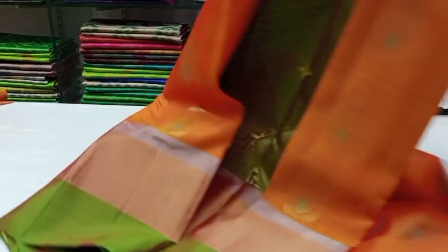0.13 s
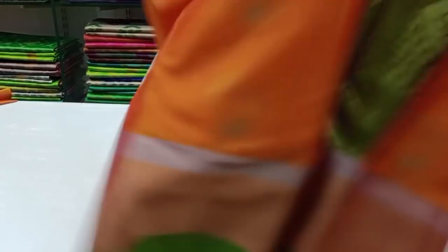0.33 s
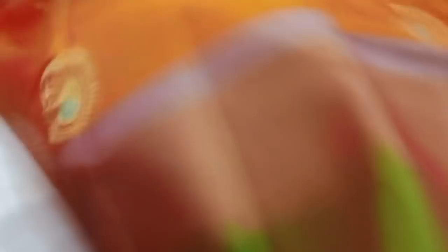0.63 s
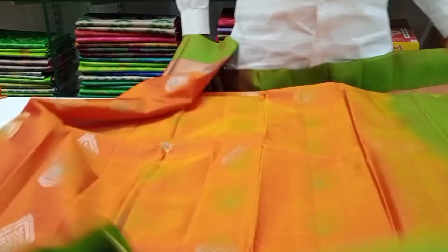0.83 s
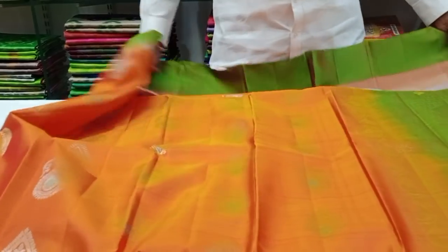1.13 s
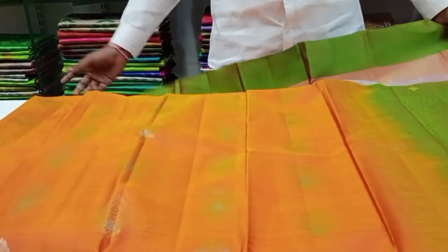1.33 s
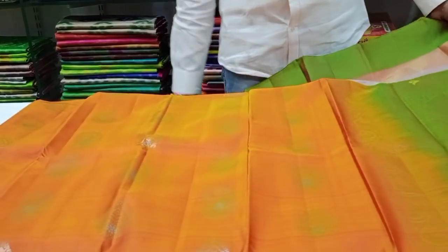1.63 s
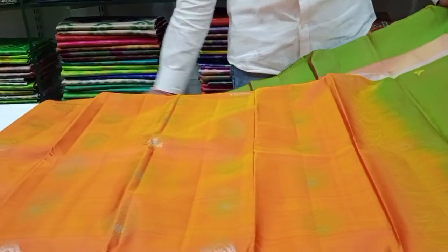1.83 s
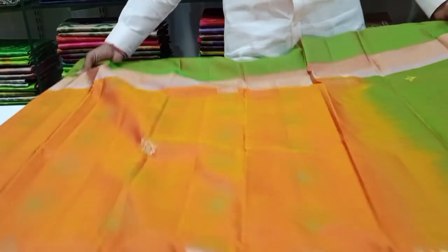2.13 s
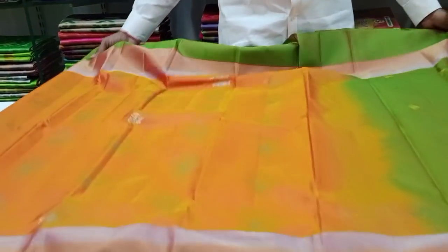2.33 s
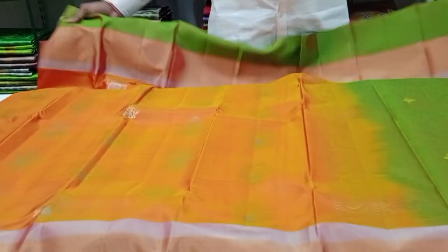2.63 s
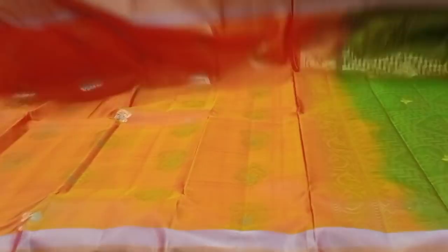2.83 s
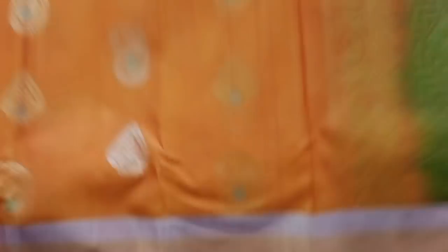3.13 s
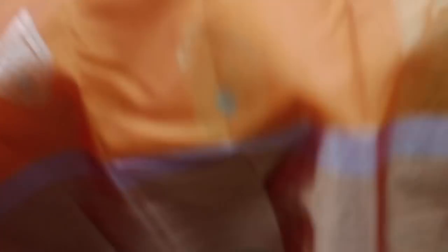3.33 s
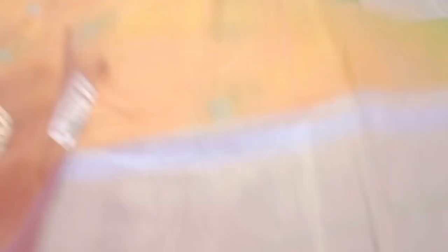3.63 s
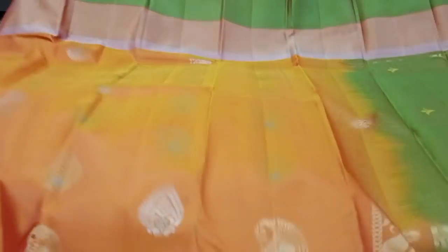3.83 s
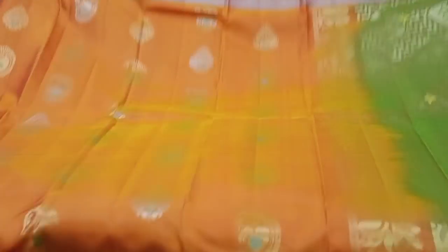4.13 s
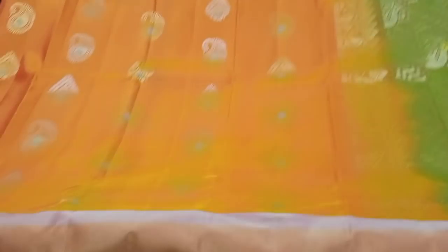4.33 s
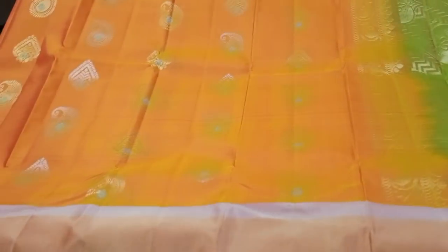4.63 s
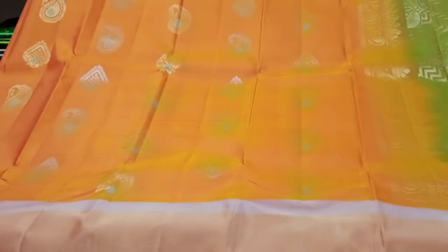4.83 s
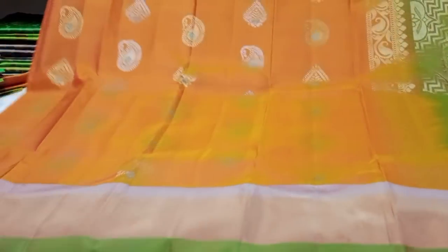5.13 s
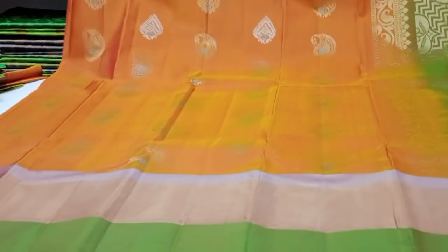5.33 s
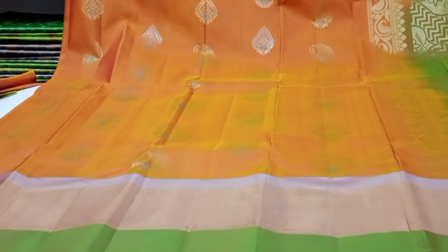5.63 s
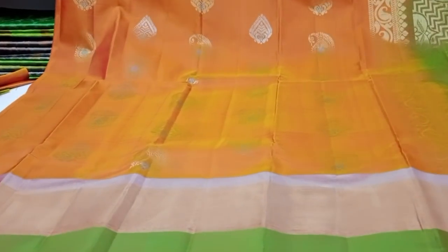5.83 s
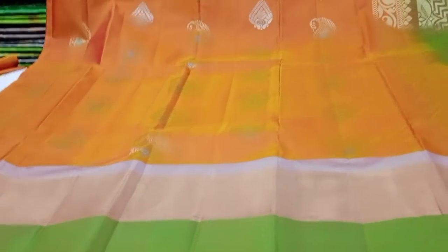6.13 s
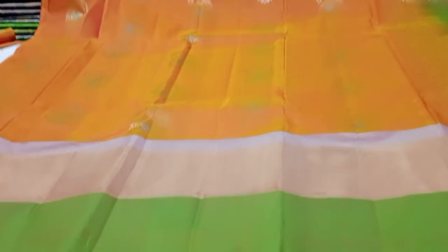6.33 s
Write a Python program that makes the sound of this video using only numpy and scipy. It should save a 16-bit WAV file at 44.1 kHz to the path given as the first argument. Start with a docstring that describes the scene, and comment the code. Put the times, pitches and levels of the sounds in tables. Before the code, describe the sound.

In a quiet shop, close to a hand-held microphone, silk is lifted with crisp swishes and crease snaps, building to a loud flapping slap and low air thump. Softer slides and a quick zipping pull follow, then two dull, heavy puffs of air. After a near-quiet pause come a small creaky grip noise and short, squeaky brushing strokes on the microphone case.

```python
"""A silk sari is lifted, shaken out and spread on a shop counter, close to a hand-held microphone.
Sliding cloth is a stream of random thread clicks and hiss; creases snap and folds slap as clicks with scuffs.
The air it pushes buffets the microphone: swelling low noise, with short booms from damped modes.
Later something brushes in short strokes close by, probably a finger or sleeve on the microphone's case:
stick and slip, with ringing modes and gliding bands. Steady coloured noise is the quiet shop behind."""
import sys
import numpy as np
from scipy import signal
from scipy.fft import rfft, irfft, next_fast_len
from scipy.io import wavfile
from scipy.ndimage import uniform_filter1d

SR = 44100
rng = np.random.default_rng(int(sys.argv[2]) if len(sys.argv) > 2 else 0)


def output_pcm(signal):
    """Save a mono or channel-first signal as 16-bit PCM at the path in sys.argv[1].

    Samples are clipped to [-1, 1] before scaling.
    """
    pcm = np.clip(np.atleast_2d(signal).T, -1, 1) * 32767
    wavfile.write(sys.argv[1], SR, np.round(pcm).astype(np.int16))


N = 286341

# Creases snapping. Each row: time in seconds, relative level in dB.
SNAPS = [(0.234, -19.5), (0.378, -21.5), (0.491, -21), (1.1821, -18), (1.55, -36.5), (1.743, -31),
         (2.188, -44), (2.8357, -39.5), (3.2233, -35.5), (3.789, -38), (3.9845, -42.5), (4.0614, -38)]
# The grip on the case shifts. Each row: peak in seconds, rise in seconds, fall in seconds, level in dB.
GRIPS = [(4.67, 0.025, 0.069, -47), (4.722, 0.092, 0.047, -49), (5.097, 0.027, 0.029, -58.5)]
# One long rub that presses ever harder. Each row: time in seconds, scrape level in dB, body level in dB.
RUBBING = [(5.96, -93, -66), (6.0, -54.5, -66), (6.04, -39, -56), (6.115, -43.5, -44), (6.143, -60, -49),
           (6.165, -94, -79)]
# Colour of the gripped case. Each row: frequency in Hz, relative level in dB per Hz.
GRIP_COLOUR = [(200, -17), (760, -1), (950, -23), (1230, 7.5), (1700, 2), (1880, -14), (2330, 9.5),
               (2600, -2.5), (3200, -35), (3750, -8), (5500, -15), (15000, -74)]

SWELL_DEPTH_DB = 20   # the rise and fall times of a swell are counted from this far below its top
STROKE_ROUNDNESS = 1.93   # shape of a swell: 1 = pointed, 2 = bell-shaped


def from_db(db):
    """Decibels to gain."""
    return 10 ** (np.asarray(db) / 20)


def rms_one(x):
    """Scale to unit rms."""
    return x / np.sqrt(np.mean(x ** 2) + 1e-20)


def evened(x):
    """Hold the short-term level (over 50 ms) at unit rms."""
    power = np.abs(uniform_filter1d(x ** 2, size=2200))
    return x / np.sqrt(power + 1e-18)


def cut(x, hz, kind, order=2):
    """Butterworth filter."""
    sections = signal.butter(order, hz, kind, fs=SR, output="sos")
    return signal.sosfilt(sections, x + 1e-18)


def unit_in(x, band):
    """Scale so that the given band has unit rms."""
    return x / np.std(cut(x, band, "band", order=4))


def colour(x, spectrum):
    """Causal (minimum-phase) filter with the given spectrum, found by folding its cepstrum."""
    size = 2 * next_fast_len(N // 2 + 8192)
    hz, db = np.transpose(spectrum)
    grid = np.maximum(np.arange(size // 2 + 1) * SR / size, 1)
    magnitude = from_db(np.interp(np.log(grid), np.log(hz), db))
    cepstrum = irfft(np.log(magnitude))
    cepstrum[1:size // 2] *= 2
    cepstrum[size // 2 + 1:] = 0
    response = np.exp(rfft(cepstrum))
    return irfft(rfft(x, size) * response)[:N]


def gains(rows):
    """Each dB column of a curve as a gain per sample; a curve that starts late is silent until then."""
    s, *columns = np.transpose(rows)
    t = np.arange(N) / SR
    silent = -140
    starts_late = s[0] > 1
    return [from_db(np.interp(t, s, c, left=silent if starts_late else c[0], right=silent))
            for c in columns]


def swells(rows, roundness, length=1):
    """Each row swells to its peak and dies away; one gain per sample for each dB column."""
    rows = np.asarray(rows)
    t = np.arange(0, N + 32, 32) / SR
    s, rise, fall = rows.T[:3, :, None]
    away = np.maximum((s - t) / rise, (t - s) / fall) / length
    shapes = from_db(-SWELL_DEPTH_DB * np.minimum(np.abs(away) ** roundness, 10))
    # overlapping swells add in power
    levels = [np.sqrt(from_db(db) ** 2 @ shapes ** 2) for db in rows.T[3:]]
    return [np.interp(np.arange(N) / SR, t, level) for level in levels]


def drift(rate):
    """Slow random wander with unit rms: noise through two equal poles at this rate in Hz."""
    step = 40   # drawn once in this many samples
    r = np.exp(-2 * np.pi * rate * step / SR)
    noise = rng.standard_normal(N // step + 2002)
    slow = signal.lfilter([1], [1, -2 * r, r * r], noise)[2000:]   # settled part
    return np.interp(np.arange(N) / step, np.arange(len(slow)), rms_one(slow))


def friction(per_s, spread_db, smooth_db):
    """Threads catch and let go: random clicks of uneven size over a smooth hiss."""
    sizes = from_db(spread_db * np.minimum(rng.exponential(1, N), 3)) * rng.choice([-1, 1], N)
    catches = rng.random(N) < per_s / SR
    clicks = rms_one(sizes * catches)
    return rms_one(clicks + from_db(smooth_db) * rng.standard_normal(N))


def touches(times, levels_db, scuff_s, scuff_db):
    """One click per touch, trailed by a short dying scuff."""
    out, age = np.zeros(N + SR), np.arange(SR // 10) / SR
    for s, db in zip(times, levels_db):
        burst = from_db(scuff_db) * rng.standard_normal(len(age)) * np.exp(-age / scuff_s)
        burst[0] = 1
        at = round(s * SR)
        out[at:at + len(age)] += from_db(db) * burst
    return out[:N]


def ring(x, modes):
    """Parallel damped modes; a unit click rings each at its own level."""
    out = np.zeros(N)
    for k, (hz, width, db) in enumerate(modes):
        r, w = np.exp(-np.pi * width / SR), 2 * np.pi * hz / SR
        mode = signal.lfilter([0, np.sin(w)], [1, -2 * r * np.cos(w), r * r], x + 1e-18)
        out += (-1) ** k * from_db(db) * mode
    return out


def shifting_echoes(x, rate, depth, count=10):
    """Reflections off nearby moving surfaces comb the sound into wandering patches."""
    out, power = x.copy(), 1
    delays_s = np.geomspace(.0005, .005, count) * rng.uniform(.85, 1.15, count)
    for lag in (delays_s * SR).astype(int):
        share = depth * drift(rate)
        out[lag:] += (share * x)[:N - lag]
        power = power + share ** 2
    return out / np.sqrt(power)


def gliding(rows, width_hz):
    """Each row swells and fades as an evened narrow band of noise whose pitch glides steadily."""
    out, t = np.zeros(N), np.arange(N) / SR
    a, b = cut(rng.standard_normal((2, N)), width_hz / 2, "low")
    size = np.sqrt(np.abs(uniform_filter1d(a ** 2 + b ** 2, size=700)) / 2) + 1e-12
    for s, rise, fall, db, hz, glide in rows:
        near = (t > s - 2 * rise) & (t < s + 2 * fall)
        age = t[near] - s
        phase = 2 * np.pi * (hz * age + glide * age ** 2 / 2)
        level = from_db(db - SWELL_DEPTH_DB * np.maximum(-age / rise, age / fall) ** 2)
        out[near] += level * (a[near] * np.cos(phase) + b[near] * np.sin(phase)) / size[near]
    return out


def room_tone():
    """The quiet shop: steady noise, strongest in the bass."""
    # Each row: frequency in Hz, relative level in dB per Hz.
    shop = [(24, -34.5), (143, -3.5), (242, -11), (2290, -27.5), (5500, -39), (8210, -51)]
    return from_db(-63.5) * rms_one(colour(rng.standard_normal(N), shop))


def rumble():
    """A firm grip or rub shakes the whole case in the bass."""
    (grip,), (_, body) = swells(GRIPS, STROKE_ROUNDNESS), gains(RUBBING)
    grip_shake = grip.max() * (grip / grip.max()) ** 1.3   # grows faster than the grip
    pressure = from_db(6) * grip_shake + from_db(-1.5) * body
    return pressure * evened(cut(rng.standard_normal(N), [62, 165], "band"))


def creaks():
    """The grip lets go in a run of jerks: each knocks the case, and the first ones rasp in its upper modes."""
    # Each row: time in seconds, relative knock level in dB, relative rasp level in dB.
    jerks = [(4.6563, -30.5, -29.5), (4.664, -49, -34), (4.672, -49, -33.5), (4.704, -27.5, -48),
             (4.7165, -32, -59), (4.754, -38, -68)]
    # Upper modes of the case. Each row: frequency in Hz, width in Hz, relative level in dB.
    upper_modes = [(3690, 190, 0), (4300, 330, -2), (5430, 210, -6), (11000, 8200, -15)]
    s, knock_db, rasp_db = np.transpose(jerks)
    knock = colour(touches(s, knock_db, scuff_s=0.0022, scuff_db=-16.0), GRIP_COLOUR)
    rasp = ring(touches(s, rasp_db, scuff_s=0.004, scuff_db=-20.5), upper_modes)
    rasp = cut(rasp, 3100, "high", order=6)
    return from_db(15.5) * knock + from_db(-7.5) * rasp


def slips():
    """Each larger catch of the brushing slips and rings the case briefly."""
    # Each row: time in seconds, relative level in dB.
    catches = [(5.286, -41), (5.678, -26), (5.741, -34), (5.873, -41), (5.887, -33.5), (5.8953, -26),
               (6.227, -44), (6.335, -40.5)]
    # Modes under a light touch. Each row: frequency in Hz, width in Hz, relative level in dB.
    case_modes = [(1330, 58, -7.5), (2340, 82, 1), (2845, 150, 4.5), (4270, 220, -39)]
    s, db = np.transpose(catches)
    ringing = ring(touches(s, db, scuff_s=0.0016, scuff_db=-28.5), case_modes)
    return from_db(-9.5) * cut(ringing, [1100, 6500], "band")


def pressing():
    """Firm contact scrapes broadly, and more pressure brings out the low body of the case."""
    # Colour of the rub. Each row: frequency in Hz, relative level in dB per Hz.
    rub = [(130, -27), (450, 6.5), (820, 0), (960, -5), (1280, 6.5), (1700, -4), (2450, 3.5), (3450, -11),
           (4050, -5.5), (5400, -7), (7600, -26), (15000, -54.5)]
    (grip,), (scrape, body) = swells(GRIPS, STROKE_ROUNDNESS), gains(RUBBING)
    creak = colour(friction(per_s=450, spread_db=2.5, smooth_db=-1.5), GRIP_COLOUR)
    creak = unit_in(creak, [1100, 3200])
    drag = friction(per_s=820, spread_db=-1.5, smooth_db=-11.0)
    drag = colour(shifting_echoes(drag, rate=20.5, depth=0.2), rub)
    drag = drag * from_db(2.0 * drift(140))   # the rub judders
    upper = unit_in(cut(drag, 1140, "high", order=4), [1100, 3200])
    lower = unit_in(cut(drag, 810, "low", order=4), [400, 1000])
    return grip * creak + scrape * upper + body * lower


def brushing():
    """Light stick and slip sings in narrow bands of the case; harder strokes reach its upper resonances."""
    # Light strokes. Each row: peak in seconds, rise in seconds, fall in seconds, level in dB.
    strokes = [(4.925, 0.052, 0.053, -58), (5.03, 0.04, 0.033, -57), (5.365, 0.086, 0.11, -43.5),
               (5.57, 0.069, 0.059, -57.5), (5.695, 0.081, 0.088, -44), (5.9, 0.023, 0.028, -48),
               (5.99, 0.035, 0.091, -47), (6.11, 0.041, 0.039, -41), (6.222, 0.02, 0.021, -51.5),
               (6.34, 0.041, 0.042, -64.5)]
    # Sliding resonances. Each row: peak, rise and fall in seconds, level in dB, pitch in Hz, glide in Hz per s.
    sings = [(4.874, 0.017, 0.018, -51, 2470, -1500), (4.885, 0.036, 0.047, -55.5, 1408, -2000),
             (5.3, 0.028, 0.064, -48, 2960, -4000), (5.365, 0.063, 0.082, -44.5, 2583, -8000),
             (5.365, 0.051, 0.07, -54.5, 3680, -5000), (5.37, 0.087, 0.043, -60.5, 5430, 5000),
             (5.49, 0.13, 0.15, -71.5, 3100, 2), (5.705, 0.057, 0.06, -57, 3340, -3000)]
    # Colour of the stroke. Each row: frequency in Hz, relative level in dB per Hz.
    brush = [(1100, -28), (1400, -6), (1700, -20), (2000, -1.5), (2400, 1.5), (2950, 2.5), (3300, -9),
             (3650, -28.5), (9000, -62)]
    # Colour of the upper resonances. Each row: frequency in Hz, relative level in dB per Hz.
    upper = [(2800, 4), (3600, 4.5), (4200, 7.5), (4600, -19), (5050, 12), (5720, -0.5), (6100, -6),
             (8000, -32)]
    (light,) = swells(strokes, STROKE_ROUNDNESS)
    catches = friction(per_s=450, spread_db=4.0, smooth_db=-5.0) * from_db(1.5 * drift(96))
    catches = shifting_echoes(catches, rate=5, depth=.45)
    stroke = unit_in(colour(catches, brush), [1900, 3400])
    squeak = from_db(-12.5) * (light / light.max()) ** 0.62 * rms_one(colour(catches, upper))
    return light * (stroke + squeak) + gliding(sings, width_hz=200)


def booms(rows, mode):
    """A padded push swells into a low, short boom: a scuffed click through the same mode twice."""
    s, db = np.transpose(rows)
    push = touches(s, db, scuff_s=0.0087, scuff_db=-62.0)
    push = ring(ring(push, mode), mode)
    push = cut(push, 50, "high", order=4)
    return push * from_db(db.max()) / np.abs(push).max()


def bumps():
    """Soft bumps of hands and cloth, each a padded low boom."""
    # Each row: time in seconds, relative level in dB.
    bump_times = [(1.313, -41.5), (1.466, -37), (1.544, -36.5), (4.915, -43), (5.107, -45), (5.685, -46)]
    return booms(bump_times, [(143.2, 26.5, 0)])   # mode: Hz, width in Hz, dB


def thumps():
    """Fronts of pushed air hit the microphone and boom low."""
    # Each row: time in seconds, relative level in dB.
    fronts = [(0.670, -22), (3.362, -25.5), (3.522, -28.5), (3.905, -38), (4.565, -41)]
    return booms(fronts, [(70.5, 62, 0)])   # mode: Hz, width in Hz, dB


def sliding():
    """Rustle, hiss and sheen gains: the long slide with quick pulls of silk over silk on top."""
    # The sheet is hauled up, dragged over the counter, then slowly settles.
    # Each row: time in seconds, rustle level in dB, hiss level in dB, sheen level in dB.
    slide = [(0.0, -47, -65.5, -71.5), (0.16, -58, -57.5, -63), (0.41, -49, -62.5, -62.5),
             (0.57, -45, -54, -61), (0.655, -44, -51.5, -56), (0.69, -36, -41.5, -52),
             (0.85, -44, -51.5, -67), (0.9, -41.5, -52, -64), (1.05, -60, -65, -93),
             (1.33, -61.5, -63, -78), (1.55, -68, -84, -97), (2.4, -75.5, -78, -84),
             (2.57, -62.5, -76.5, -83), (2.8, -73.5, -83.5, -93), (4.6, -77.5, -83, -101)]
    # Quick pulls. Each row: peak, rise and fall in seconds, then rustle, hiss and sheen levels in dB.
    swishes = [(0.258, 0.073, 0.016, -46.5, -59, -58), (0.49, 0.045, 0.057, -44.5, -47.5, -55),
               (0.61, 0.015, 0.034, -61, -38.5, -56), (1.188, 0.083, 0.073, -49.5, -49.5, -49.5),
               (1.85, 0.21, 0.15, -60, -58, -76), (2.18, 0.17, 0.077, -63.5, -67, -80),
               (2.665, 0.072, 0.096, -47.5, -50.5, -101), (2.706, 0.062, 0.035, -43.5, -38.5, -57),
               (2.95, 0.14, 0.078, -61.5, -73, -75)]
    return np.hypot(gains(slide), swells(swishes, roundness=1.53))


def fullness():
    """0-1: when the whole sheet moves, its many folds merge into one even rush."""
    rustle, _, _ = sliding()
    full_rush_db = -41.5   # rustle level at which single folds are no longer told apart
    return np.clip(rustle / from_db(full_rush_db), 0, 1)


def billowing():
    """Draught and flap gains: every billow drives both, over a faint stir while the sheet still moves."""
    # Each row: peak, rise and fall of the draught in seconds, draught level in dB, flap level in dB.
    billows = [(0.255, 0.17, 0.058, -42.5, -49), (0.42, 0.091, 0.12, -35, -40.5),
               (0.53, 0.12, 0.072, -36.5, -42.5), (0.625, 0.085, 0.087, -29.5, -34.5),
               (0.682, 0.023, 0.042, -23, -23.5), (0.73, 0.077, 0.075, -27.5, -28.5),
               (0.803, 0.045, 0.11, -31.5, -28.5), (0.892, 0.081, 0.16, -32.5, -31.5),
               (1.28, 0.22, 0.33, -49, -63), (1.8, 0.22, 0.18, -50.5, -57.5), (2.0, 0.14, 0.049, -45, -80),
               (2.18, 0.17, 0.049, -50.5, -59.5), (2.75, 0.25, 0.18, -51.5, -59.5),
               (2.93, 0.097, 0.1, -44, -56.5), (3.17, 0.25, 0.54, -48, -68),
               (3.388, 0.042, 0.059, -25, -52.5), (3.475, 0.13, 0.085, -24.5, -36),
               (3.58, 0.092, 0.17, -40, -58.5), (3.92, 0.15, 0.12, -47, -85)]
    roundness, stir_db, stir_end_s = 1.18, -64.5, 4.6
    draught, _ = swells(billows, roundness)
    _, flap = swells(billows, roundness, length=0.79)   # flapping is shorter than its puff of air
    moving = np.clip((stir_end_s - np.arange(N) / SR) * 10, 0, 1)
    return np.hypot(draught, from_db(stir_db) * moving), flap


def air():
    """Lumpy eddies at the microphone port, and the faster flutter of the sheet."""
    # Colour of the eddies. Each row: frequency in Hz, relative level in dB per Hz.
    wind = [(15, -64.5), (30, -11.5), (62, 2.5), (145, 8), (200, -9.5), (290, -25), (700, -87)]
    # Colour of the fluttering sheet. Each row: frequency in Hz, relative level in dB per Hz.
    sheet = [(110, -18), (210, -5), (355, 2.5), (480, -4.5), (660, -12), (950, -17), (2500, -60)]
    draught, flap = billowing()
    # the gust sets the strength; single eddies vary only a little
    eddies = evened(colour(rng.standard_normal(N), wind))
    flutter = friction(per_s=900, spread_db=2.0, smooth_db=1.5)
    flutter = shifting_echoes(flutter, rate=5.85, depth=0.57)
    flutter = evened(colour(flutter, sheet)) * from_db(1.9 * drift(41))
    flutter = unit_in(flutter, [260, 900])
    # air alone gives a dull billow; rubbing cloth opens it up into flutter
    billow = evened(cut(rng.standard_normal(N), [190, 335], "band", order=4))
    rustle, _, _ = sliding()
    contact = np.clip(from_db(9.0) * rustle / (flap + 1e-9), 0, 1)
    return draught * eddies + flap * (contact * flutter + from_db(4.5) * (1 - contact) * billow)


def thin_squeaks():
    """Faint, short, nearly pure tones of steady pitch."""
    # Each row: peak in seconds, level in dB, pitch in Hz.
    tones = [(1.235, -55, 799), (3.055, -63.5, 1423), (3.335, -62, 1450), (4.356, -57.5, 598)]
    swell_s = 0.056   # both rise and fall
    return gliding([(s, swell_s, swell_s, db, hz, 0) for s, db, hz in tones], width_hz=65)


def zips():
    """Taut silk zips over its own ribs, in narrow bands of gliding pitch."""
    # Each row: peak, rise and fall in seconds, level in dB, pitch in Hz, glide in Hz per second.
    pulls = [(1.07, 0.36, 0.12, -59.5, 2940, -1000), (1.255, 0.027, 0.046, -53, 2770, -3000),
             (1.84, 0.13, 0.15, -56, 1628, -2500), (1.87, 0.052, 0.044, -55.5, 6060, -3000),
             (2.645, 0.061, 0.05, -50, 3510, 9997), (2.66, 0.051, 0.023, -46, 2560, 2997)]
    return gliding(pulls, width_hz=450)


def slaps():
    """A broad fold lands abruptly on the counter and crumples in a dying midrange rush."""
    # Each row: time in seconds, relative level in dB.
    landings = [(0.673, -30.5), (0.716, -31), (0.729, -34.5), (0.787, -39), (0.814, -47), (0.882, -33),
                (0.961, -42)]
    # Colour of the slap. Each row: frequency in Hz, relative level in dB per Hz.
    slap = [(300, -3), (750, -3), (1800, -11.5), (6000, -54)]
    s, db = np.transpose(landings)
    crumple_db = -12   # below the click; the row level is that of the crumpling
    blows = touches(s, db - crumple_db, scuff_s=0.036, scuff_db=crumple_db)
    return colour(blows, slap) / np.std(colour(rng.standard_normal(N), slap))


def creases():
    """A fold pulled taut snaps straight; softer snaps are duller."""
    # Colour of a snap. Each row: frequency in Hz, relative level in dB per Hz.
    crease = [(400, -41), (1200, -7), (2800, 4), (8000, -22.5), (15000, -35)]
    s, db = np.transpose(SNAPS)
    snaps = colour(touches(s, db, scuff_s=.003, scuff_db=-22), crease)
    force = np.interp(np.arange(N) / SR, s, from_db(db - db.max()))
    snaps = force * snaps + (1 - force) * cut(snaps, 4000, "low")
    return snaps * from_db(db.max() - 6.5) / np.abs(snaps).max()


def afterring():
    """Each snapped fold leaves the taut cloth ringing briefly and faintly, however hard the snap."""
    # Modes of the taut cloth. Each row: frequency in Hz, width in Hz, relative level in dB.
    taut = [(1430, 180, -8), (2430, 480, 10.5)]
    s, db = np.transpose(SNAPS)
    same_db = np.full(len(s), db.min())
    tail = ring(touches(s, same_db, scuff_s=0.02, scuff_db=-9.0), taut)
    return from_db(-9.5) * tail / np.std(ring(rng.standard_normal(N), taut))


def silk():
    """Folds rustle low, the weave hisses above them, and fast sliding adds a fizz on top."""
    # Colour of the cloth. Each row: frequency in Hz, relative level in dB per Hz.
    silk_colour = [(800, -12), (1000, -15.5), (1300, 2.5), (4000, -1), (6400, 1.5), (7200, -8),
                   (8400, -15.5), (11000, -12.5), (13500, -31)]
    # Treble resonance of the microphone port. Each row: frequency in Hz, width of one pass in Hz, level in dB.
    port = [(15300, 1300, 0)]
    rustle, hiss, sheen = sliding()
    patchy = 1 - np.clip(0.78 * fullness(), 0, 1)
    folds = friction(per_s=650, spread_db=2.0, smooth_db=0.0)
    folds = shifting_echoes(folds, rate=12.0, depth=0.59 * patchy)
    folds = rms_one(cut(colour(folds, silk_colour), 3750, "low", order=5))
    folds = folds * from_db(1.24 * drift(34))
    weave = friction(per_s=5800, spread_db=5.5, smooth_db=4.5)
    weave = colour(shifting_echoes(weave, rate=9.6, depth=0.52 * patchy), silk_colour)
    # loose folds crinkle in flurries
    weave = weave * from_db(2 * patchy * drift(10) + 2 * patchy * np.tanh(drift(90)))
    # the top grows faster than the hiss as the cloth speeds up
    fizz = from_db(-4.5) * (hiss / hiss.max()) ** 0.54 * rms_one(cut(weave, 6250, "high", order=4))
    threads = rms_one(cut(weave, [3500, 8000], "band", order=4))
    shine = rms_one(ring(ring(weave, port), port))
    return rustle * folds + hiss * (from_db(2.5) * threads + fizz) + sheen * shine


def scene():
    """Cloth and air in a quiet shop, with the brushing right at the microphone."""
    case = brushing() + pressing() + slips() + creaks() + rumble()
    buffeting = air() + thumps() + bumps()
    cloth = silk() + zips() + thin_squeaks() + slaps() + creases() + afterring()
    return (room_tone() + case + buffeting + cloth)[None]


def record(dry):
    """The top is cut steeply above 15650 Hz by an elliptic low-pass."""
    steep = signal.ellip(12, .2, 80, 15650, fs=SR, output="sos")
    return signal.sosfilt(steep, dry)


dry = scene()
out = record(dry)
output_pcm(out)
```